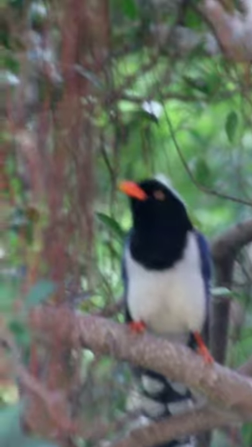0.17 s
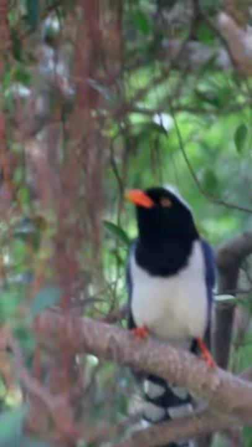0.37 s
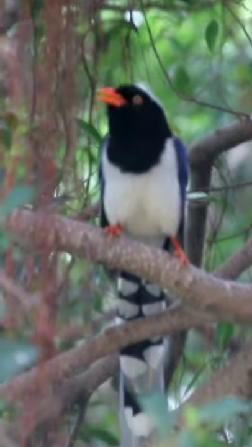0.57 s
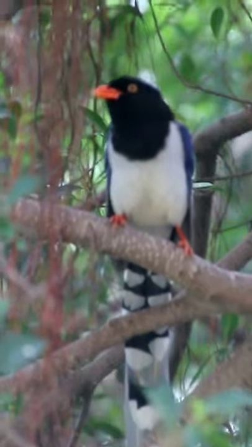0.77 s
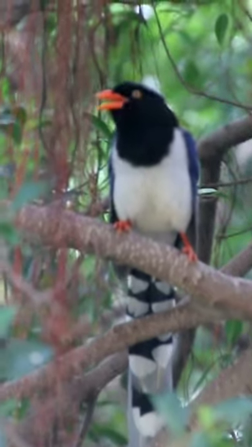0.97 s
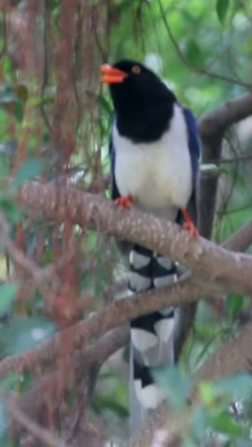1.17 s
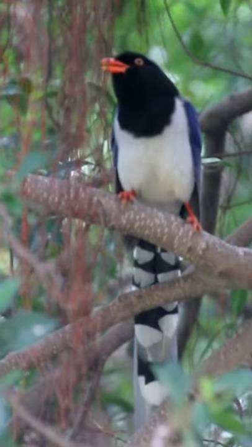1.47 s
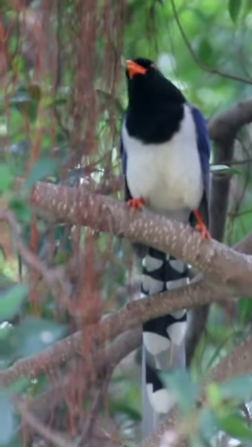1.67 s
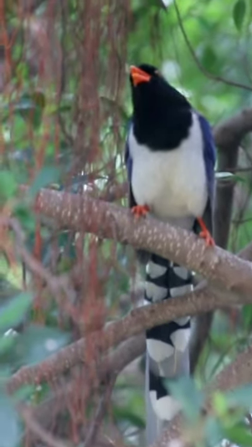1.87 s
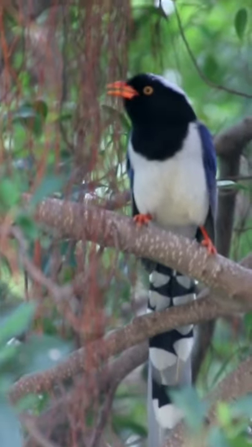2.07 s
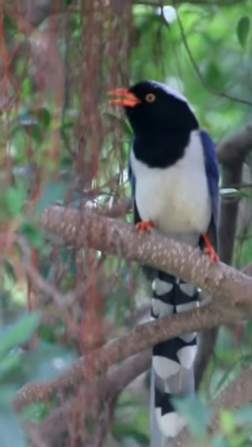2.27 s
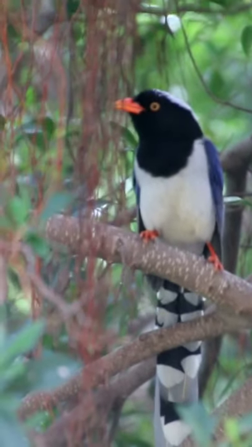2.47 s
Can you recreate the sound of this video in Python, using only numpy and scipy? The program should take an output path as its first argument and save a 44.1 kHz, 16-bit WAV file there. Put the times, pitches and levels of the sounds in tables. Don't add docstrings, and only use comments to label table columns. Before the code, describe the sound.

A magpie gives a tiny cluck and a high warbled whistle, then seven short harsh notes sweeping upward, unevenly spaced. Leafy trees scatter brief echoes; distant traffic hums softly. Fairly close stereo microphone outdoors.

```python
import sys
import numpy as np
from scipy import signal
from scipy.fft import rfft, irfft, next_fast_len
from scipy.io import wavfile
from scipy.ndimage import uniform_filter1d, map_coordinates

SR = 44100
rng = np.random.default_rng(int(sys.argv[2]) if len(sys.argv) > 2 else 0)


def file_out(sig):
    cols = np.atleast_2d(sig).T
    lim = np.clip(cols, -1, 1)
    pcm = np.round(lim * 32767).astype(np.int16)
    wavfile.write(sys.argv[1], SR, pcm)


def to_linear_factor(level_db):
    exponent = np.asarray(level_db, float) / 20
    return 10 ** exponent


N = 115983


def unit(x):
    return x / np.sqrt(np.mean(x ** 2) + 1e-20)


def along(points, hz):
    f, value = np.transpose(points)
    return np.interp(np.log(hz + 1), np.log(f + 1), value)


def curves(rows, at):
    places, *columns = np.transpose(rows)
    return [np.interp(at, places, column) for column in columns]


def during(rows, t):
    return (t > rows[0][0]) & (t < rows[-1][0])


def wobble(rate, size=N):
    knots = rng.standard_normal(size // 8 + 4)
    return map_coordinates(knots, [np.arange(size) * rate / SR])


def filtered(x, response):
    m = next_fast_len(N + SR // 2)
    return irfft(rfft(x, m) * response(np.fft.rfftfreq(m, 1 / SR)), m)[..., :N]


# frequency in Hz, likeness 0-1.
ALIKE = [(60, .98), (300, 0.99), (700, 0.94), (1500, 0.7), (4000, 0.17), (12000, 0.1)]


def rush(spectrum, patchy_db):
    z = signal.stft(rng.standard_normal((2, N)), nperseg=512)[2]
    patches = uniform_filter1d(rng.standard_normal(z.shape[1:]), size=6, axis=0)
    patches = uniform_filter1d(patches, size=10, axis=1)
    pair = signal.istft(z * to_linear_factor(patchy_db * unit(patches)), nperseg=512)[1][:, :N]

    def mid_side(hz):
        turn = np.arccos(np.clip(along(ALIKE, hz), -1, 1)) / 2
        return to_linear_factor(along(spectrum, hz)) * np.array([np.cos(turn), np.sin(turn)])

    mid, side = filtered(pair, mid_side)
    return unit(np.array([mid + side, mid - side]))


# time in seconds, level in dB.
TRAFFIC = [(0.05, -27), (0.32, -28), (1.15, -28.5), (1.27, -28), (2.43, -27), (2.62, -28)]
# frequency in Hz, density in dB per Hz.
HUM = [(15, -40), (25, -18), (59, -3.5), (135, -4.5), (201, -3), (289, -3.5), (335, -4.5), (422, -6.5),
       (1300, -10.5), (1690, -43), (2860, -120)]
# frequency in Hz, density in dB per Hz.
HISS = [(760, -69), (1300, -7.5), (1570, -3), (1740, -5.5), (2400, -8), (4810, -15.5), (7070, -24),
        (10700, -31), (15600, -45.5)]


def traffic():
    db, = curves(TRAFFIC, np.arange(N) / SR)
    hum = to_linear_factor(db + .5 * wobble(5) + .5 * wobble(14)) * rush(HUM, patchy_db=1.2)
    hiss_db = db.mean() - 7.5 + 0.17 * wobble(6.2)
    return hum + to_linear_factor(hiss_db) * rush(HISS, patchy_db=0.97)


# start in seconds, length in seconds, first and last pitch in Hz, level in dB.
FAR = [
    (2.26, .075, 1470, 1410, -40),
    (2.485, .06, 1480, 1600, -39),
    (2.535, .12, 1615, 1645, -42),
    (2.57, .07, 985, 970, -42),
    (2.29, .07, 1010, 1020, -42),
    (2.385, .05, 660, 700, -41),
    (2.53, .035, 575, 580, -41),
    (2.31, .3, 10420, 10400, -62),
]
# time in seconds, level in dB, centre in Hz.
TICKS = [
    (.16, -56, 5560),
    (2.545, -70, 13100),
]


def far():
    t, out = np.arange(N) / SR, np.zeros(N)
    for start, length, first_hz, last_hz, db in FAR:
        u = np.clip((t - start) / length, 0, 1)
        hz = first_hz + (last_hz - first_hz) * u + 12 * wobble(120)
        swell = np.abs(np.sin(np.pi * u)) ** .5 * (u < 1)
        level = to_linear_factor(db + 3 + 2.5 * wobble(60))
        out = out + level * swell * np.sin(2 * np.pi * np.cumsum(hz) / SR)
    for s, db, hz in TICKS:
        puff = to_linear_factor(db - 60 * np.abs(t - s) / 0.035) * rng.standard_normal(N)
        out = out + filtered(puff, lambda f: 4 * np.exp(-(np.log((f + 1) / hz) * 12000 / hz) ** 4))
    return out


# frequency in Hz, 60 dB decay in seconds.
TREES = [(1500, 0.78), (3200, 0.54), (6500, 0.37), (12000, 0.15)]
# frequency in Hz, level in dB.
SCATTER = [(1500, -11), (3200, -6), (6000, -2), (12000, 3.5)]


def trees(x):
    echo_db, near_db, near_s = -1, -22, 0.09
    hz, t, z = signal.stft(rng.standard_normal((2, SR // 2)), SR, nperseg=256)
    tail = signal.istft(z * to_linear_factor(-60 * t / along(TREES, hz)[:, None]), SR, nperseg=256)[1]
    near = rng.standard_normal(tail.shape) * to_linear_factor(-60 * np.arange(tail.shape[1]) / SR / near_s)
    answer = to_linear_factor(echo_db) * tail / np.linalg.norm(tail[0])
    answer = answer + to_linear_factor(near_db) * near / np.linalg.norm(near[0])
    echo = signal.fftconvolve(x[None], answer, axes=1)[:, :N]
    return filtered(echo, lambda f: to_linear_factor(along(SCATTER, f)))


# centre in Hz, width in Hz, level in dB.
THROAT = [(2006, 580, -12), (3162, 560, -2.5), (4066, 870, -9), (6140, 2400, -11), (10040, 3500, -15),
          (11570, 1600, -13)]


def throat(f):
    total = 0
    for k, (centre, width, db) in enumerate(THROAT):
        damping = 1j * f * width
        total = total + (-1) ** k * to_linear_factor(db) * damping / (centre * centre - f * f + damping)
    return total


def voice(hz, overtones_db):
    phase = 2 * np.pi * np.cumsum(hz) / SR
    tone = 0
    for k, db in enumerate(overtones_db, 1):
        tone = tone + to_linear_factor(db) * np.sin(k * phase) * (k * hz < SR / 2.5)
    return tone, phase


OVERTONES_DB = [0, -3, -8, -13, -18, -23, -28]
# time in seconds, pitch in Hz, level in dB, warble depth as a share of pitch.
WHISTLE = [(.27, 4350, -60, 0.0043), (.274, 4205, -28, .005), (.288, 4320, -29, 0.0078),
           (.296, 4070, -29.5, 0.045), (.315, 4346, -27, 0.035), (.33, 4490, -31.5, 0.018),
           (.345, 4575, -25.5, 0.0063), (.357, 4600, -35, 0.006), (.366, 4630, -53, .01)]
# time in seconds, pitch in Hz, level in dB.
CLUCK = [
    (.265, 1480, -53),
    (.269, 1483, -21),
    (.275, 1603, -17),
    (.281, 1650, -52),
]


def whistle():
    t = np.arange(N) / SR
    hz, db, depth = curves(WHISTLE, t)
    beat = 2 * np.pi * 105 * (t - .3) + 0.18 * wobble(51)
    pitch = hz * (1 + depth * np.sin(beat) + .01 * wobble(600))
    tone = voice(pitch, [0, -14, -29])[0] + to_linear_factor(-30) * rng.standard_normal(N)
    tone = to_linear_factor(db + 3 + 2.5 * wobble(220)) * tone

    hz, db = curves(CLUCK, t)
    cluck = voice(hz * (1 + 0.016 * wobble(960)), OVERTONES_DB)[0] + to_linear_factor(-7) * rng.standard_normal(N)
    cluck = to_linear_factor(db + 6.5) * cluck
    return tone * during(WHISTLE, t) + filtered(cluck * during(CLUCK, t), throat)


# start, pitch leap and end in seconds, first pitch over the usual as a ratio.
NOTES = [
    (.508, .558, .582, 1.06),
    (.927, .974, 1.013, 1.02),
    (1.123, 1.172, 1.204, 1.0),
    (1.368, 1.421, 1.454, 1.0),
    (1.785, 1.84, 1.862, .84),
    (1.95, 2.007, 2.047, 1.03),
    (2.198, 2.257, 2.288, 1.04),
]
NOTE_DB = [-19, -16, -17, -18, -17.5, -17.5, -20]
# place, pitch in Hz, warble depth as a share of pitch, breath in dB.
RISE = [(0, 1540, .01, 2), (.35, 1630, .02, -3), (.55, 1860, .02, -7), (.78, 2120, .02, -7),
        (.97, 2400, .02, -5), (1.02, 3030, .025, -10), (1.5, 3200, .04, -13), (2, 3300, .03, -13)]
# place, level in dB.
EFFORT = [(0, -12), (.3, 6), (.7, 7), (.94, 6.5), (1.06, 8.5), (1.5, 5.5), (1.85, 5), (2, 0)]
# time from the note's end in seconds, pitch in Hz, level in dB, chopped share 0-1.
SECOND = [(-.028, 3500, -30, .95), (-.018, 3720, -5, .95), (-.004, 3880, -4, .8), (.003, 4020, -3, .1),
          (.01, 4060, -7, .1), (.014, 4050, -40, .1)]
SECOND_DB = [6, 2, 7.5, 8, 0.69, 5.2, 9]


def chatter():
    warble_hz, warble_db, shimmer_db = 129, 2.5, 2
    jitter, jitter_held = .032, .02
    release_s, air_hz = .005, 15100
    out, size = np.zeros(N + SR), SR // 6
    for (start, leap, end, first), db, second_db in zip(NOTES, NOTE_DB, SECOND_DB):
        t = start + np.arange(size) / SR
        place = np.interp(t, [start, leap, end], [0, 1, 2])
        hz, depth, breath_db = curves(RISE, place)
        effort_db, = curves(EFFORT, place)
        hz = hz * (1 + (first - 1) * np.clip(1 - place / .75, 0, 1) ** .4)

        beat_hz = warble_hz * (1 + 0.149 * wobble(53.1, size))
        beat = 2 * np.pi * (np.cumsum(beat_hz) / SR + rng.random())
        warble = np.sin(beat) - .5 * np.cos(2 * beat)
        scatter = np.where(place < 1, jitter, jitter_held) * wobble(689, size)
        tone, phase = voice(hz * (1 + depth * warble + scatter), OVERTONES_DB)

        breath = to_linear_factor(breath_db) * rng.standard_normal(size) * (1 + np.cos(phase))
        flutter_db = warble_db * np.clip(place - .5, 0, 1) * np.cos(beat - .8)
        flutter = to_linear_factor(flutter_db + shimmer_db * wobble(396.3, size))
        shape = to_linear_factor(db + effort_db) * np.clip((end - t) / release_s, 0, 1)

        high_hz, high_db, chop = curves(SECOND, t - end)
        chips = to_linear_factor(db + second_db + high_db + 2.1 * wobble(288.7, size))
        chips = chips * (1 + np.clip(chop, 0, 1) * np.sin(beat))
        high_bend = 0.044 * chop * np.sin(beat - 1.2) + jitter_held * wobble(693.5, size)
        high = voice(high_hz * (1 + high_bend), [0, -12])[0]
        note = shape * (flutter * tone + breath) + during(SECOND, t - end) * chips * high
        out[round(start * SR):][:size] += note
    return filtered(out[:N], lambda f: throat(f) / (1 + (f / air_hz) ** 6))


def scene():
    bird = chatter() + whistle()
    return bird + trees(bird) + far() * to_linear_factor([[2.5], [-3.5]]) + traffic()


def low_pass(x):
    return signal.sosfilt(signal.butter(12, 15710, fs=SR, output="sos"), x)


# frequency in Hz, half of left over right in dB.
LEFT_DB = [(60, .75), (300, 1), (1500, .3), (3000, 0.24), (10000, 0.6)]


def record(dry):
    sides = np.array([[1], [-1]])
    ports = filtered(dry, lambda hz: to_linear_factor(along(LEFT_DB, hz) * sides) * (hz < 15750))
    started = np.arange(N) > .0362 * SR
    return low_pass(ports * started)


dry = scene()
out = record(dry)
file_out(out)
```